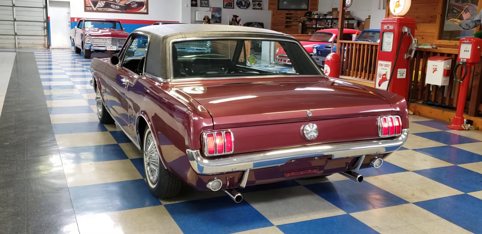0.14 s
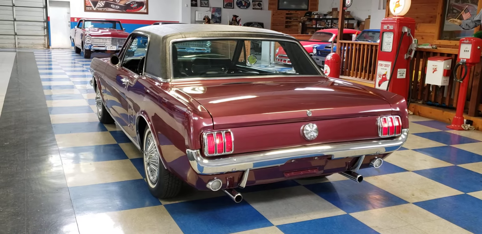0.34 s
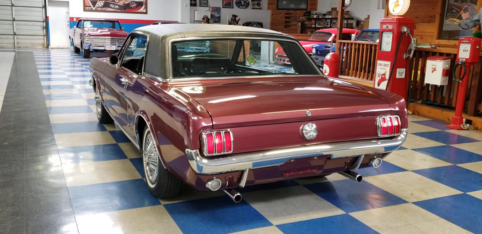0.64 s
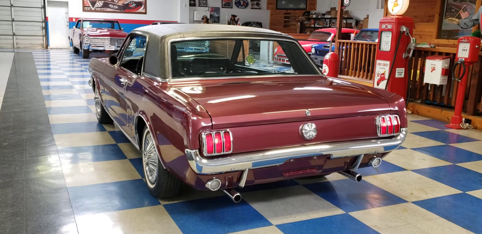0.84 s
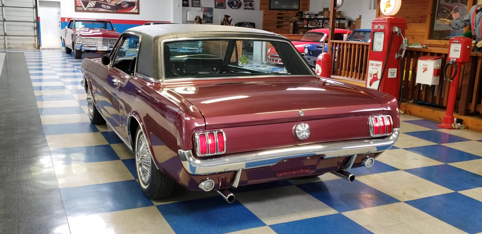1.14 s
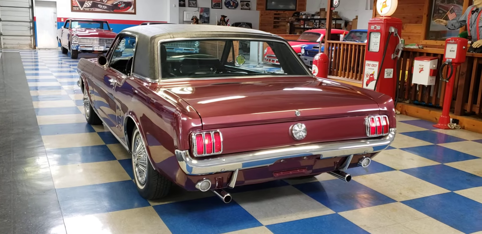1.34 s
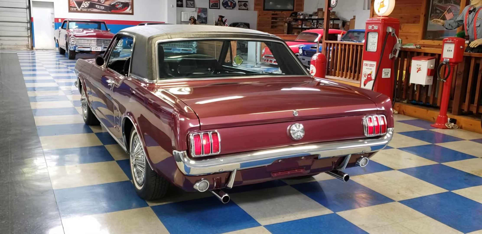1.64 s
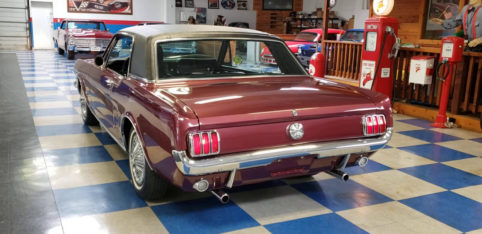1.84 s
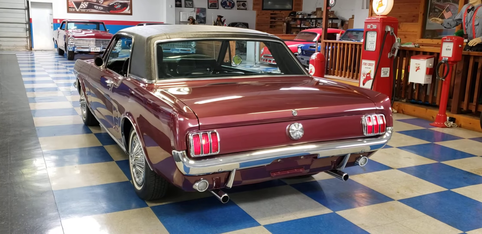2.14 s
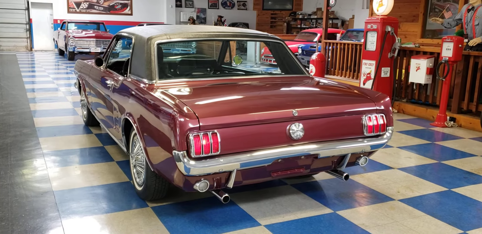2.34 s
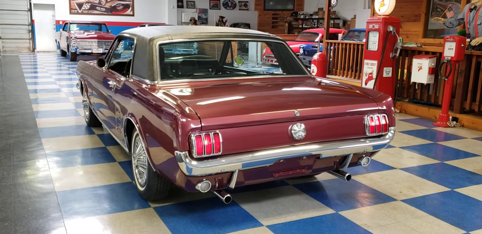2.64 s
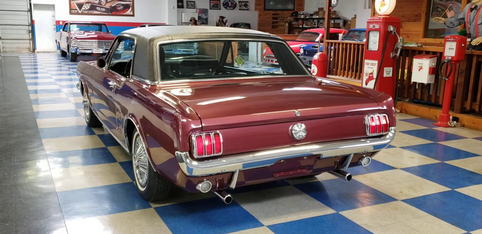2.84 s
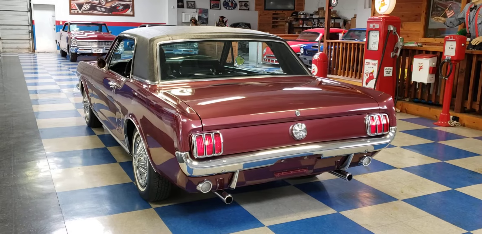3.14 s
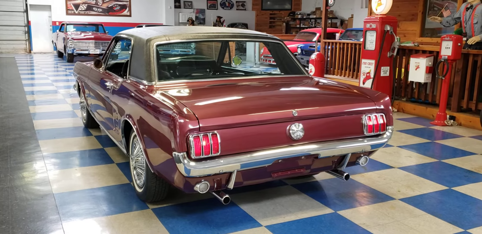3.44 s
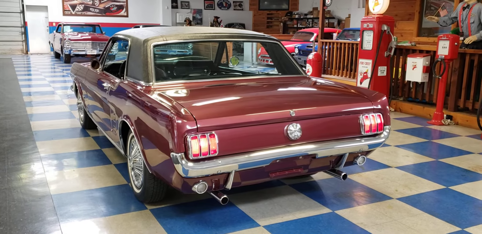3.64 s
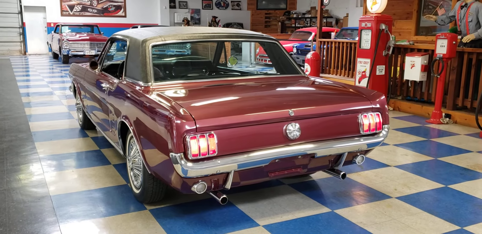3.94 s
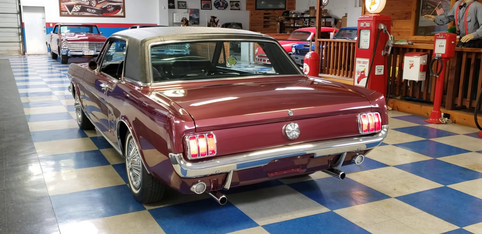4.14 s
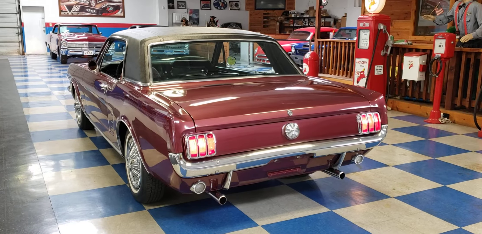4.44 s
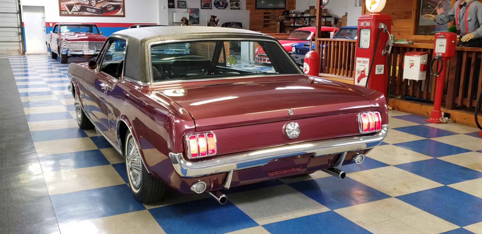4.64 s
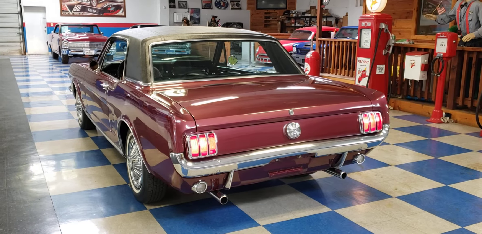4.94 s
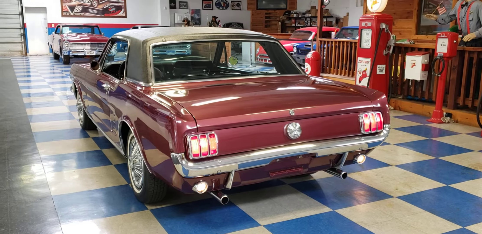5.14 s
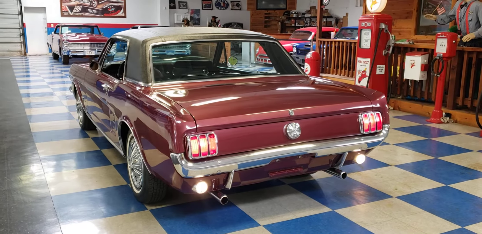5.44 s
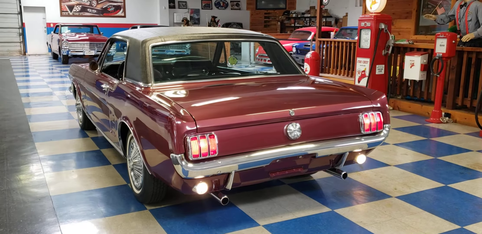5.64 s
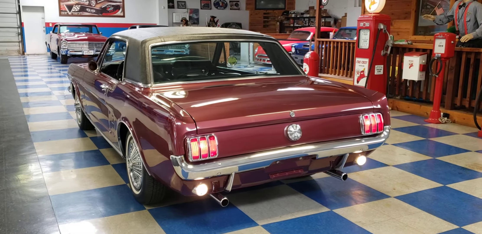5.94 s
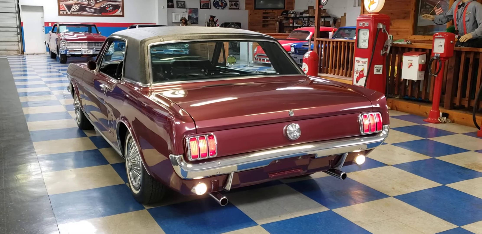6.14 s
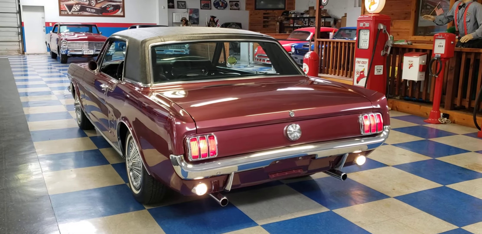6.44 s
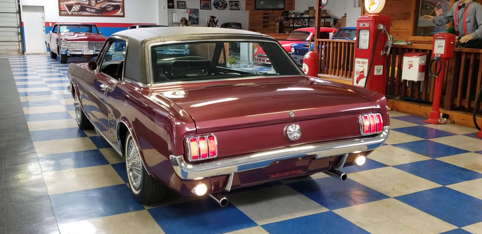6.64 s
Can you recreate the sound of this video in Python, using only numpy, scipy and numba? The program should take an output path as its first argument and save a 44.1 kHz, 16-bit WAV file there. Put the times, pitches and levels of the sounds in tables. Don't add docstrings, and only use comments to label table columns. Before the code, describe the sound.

An old V8 idles with a lumpy burble in a large tiled hall, is revved twice, then a loud metallic gear clack rings out.

```python
import sys
import numpy as np
from scipy import signal
from scipy.fft import rfft, irfft
from scipy.io import wavfile
from scipy.ndimage import uniform_filter1d
from numba import njit

SR = 44100
rng = np.random.default_rng(int(sys.argv[2]) if len(sys.argv) > 2 else 0)


def unload_wav(signal):
    wavfile.write(
        sys.argv[1],
        SR,
        np.round(np.clip(np.atleast_2d(signal).T, -1, 1) * 32767).astype(np.int16),
    )


def amplitude_ratio(level_db):
    exponent = np.asarray(level_db, float) / 20
    return 10 ** exponent


N = 299880
TIME_S = np.arange(N) / SR
BINS_HZ = np.arange(N // 2 + 1) * SR / N + 1
IDLE_HZ = 58


def unit(x):
    return x / np.sqrt(np.mean(x ** 2))


def steady(x):
    return x / np.sqrt(uniform_filter1d(x ** 2, size=SR // 2) + 1e-18)


def together(*dbs):
    return 10 * np.log10(sum(amplitude_ratio(db) ** 2 for db in dbs))


def speed_db(hz):
    return 20 * np.log10(hz / IDLE_HZ)


def columns(table):
    start_s, *rest = np.transpose(table)
    return [np.interp(TIME_S, start_s, column) for column in rest]


def over_hz(table):
    hz, value = np.transpose(table)
    return np.interp(np.log(BINS_HZ), np.log(hz), value)


@njit
def svf(x, hz, width):
    y, band, low = np.empty(len(x)), 0., 0.
    g, damping = np.tan(np.pi * hz / SR), width / hz
    for i in range(len(x)):
        v = (band + g * (x[i] - low)) / (1 + g * (g + damping))
        band, low = 2 * v - band, low + 2 * g * v
        y[i] = damping * v
    return y


def ring(x, modes):
    out = 0
    for k, (hz, width_hz, level_db) in enumerate(modes):
        out = out + (-1) ** k * amplitude_ratio(level_db) * svf(x, 1. * hz, 1. * width_hz)
    return out


def tuning(hz, note_hz, width_hz):
    return 1 / (1 + (2 * (hz - note_hz) / width_hz) ** 2)


def walk(rate):
    hold = int(SR / rate)
    steps = np.repeat(rng.standard_normal(N // hold + 1), hold)
    return 1.3 * uniform_filter1d(uniform_filter1d(steps, hold), hold)[:N]


def air(colour_db=0):
    # frequency_hz, likeness_0_to_1
    likeness = [(60, 1.0), (130, 0.9), (290, 0.72), (640, 0.95), (1410, 0.11), (3100, 0.01), (6820, 0),
                (15000, -0.0)]
    like = np.clip(over_hz(likeness), 0, 1) ** .5
    mid, side = rfft(rng.standard_normal((2, N))) * amplitude_ratio(colour_db) * np.sqrt([1 + like, 1 - like])
    return unit(irfft(np.array([mid + side, mid - side]), N))


def engine():
    # start_s, firing_rate_hz, exhaust_pressure_db, evenness_0_to_1
    run = [(0, 57.16, -1, 0.04), (1.1, 58.42, 2.5, 0.1), (1.19, 69.46, 2.5, 0.22), (1.4, 130.2, 2.5, 0),
           (1.53, 113.5, 3, 0.2), (2.05, 80.5, -3.5, .08), (2.14, 96.75, 2, 0.04), (2.31, 145.9, 4, 0),
           (2.52, 122.7, -2, 0.04), (2.76, 99.63, 1.5, 0.03), (2.99, 85.3, -2, 0.09),
           (3.5, 68.82, -0.5, 0.1), (4.2, 60.62, -1, 0.12), (4.9, 63.52, 1.5, 0.1),
           (5.49, 59.28, 1.5, 0.27), (5.68, 48, 2, 0.05), (5.97, 43.05, -4.5, .04),
           (6.1, 45.57, -0.5, 0.66)]
    # start_s, air_leak_db, edge_sharpness_db
    pedal = [
        (.4, -58.5, -13),
        (1, -52, -15),
        (2.8, -73, -25),
        (3.55, -67, -10),
        (3.7, -52.5, -18),
        (4.42, -50.5, -16.5),
        (5.2, -49, -7.5),
        (5.7, -49, -10),
        (6.8, -50.5, -9.5),
    ]
    # floor_db, level_at_idle_db, growth_db_per_db_of_speed, full_throttle_db
    ring_law = (-57, -39.5, 1.08, -49)
    rasp_law = (-48, -48.5, 1.68, -44)
    burble_law = (-32, -46, 2.5, -43)
    intake_law = (-49.5, -66, 3, -34.5)
    fan_law = (-56, -55.5, 2.5, -49)
    servo_law = (-109, -73, 3, -44.5)
    edge_law = (-97, -78.5, 2.5, -64)
    fine_law = (-70, -77, 3, -52)
    hz, pressure_db, even = columns(run)
    leak_db, sharp_db = columns(pedal)
    even = np.clip(even, .03, 1)
    suction_db = np.maximum(throttle(), -60)
    coast = np.clip((hz - 59.2) / 8.2, 0, 1) * np.clip(1 - amplitude_ratio(suction_db), 0, 1)
    popping = coast * np.clip((hz - 86) / 15, 0, 1)

    first_db, second_db = orders(hz, pressure_db, suction_db, even, coast)
    ring_db = layer(ring_law, hz, suction_db) + 0.48 * pressure_db
    rasp_db = layer(rasp_law, hz, suction_db) + 0.56 * pressure_db
    burble_db = layer(burble_law, hz, suction_db) + pressure_db + 0.5 * coast
    pipes, rasp, gate = exhaust(hz, first_db, second_db, ring_db, rasp_db, even, burble_db, popping)

    intake_db = layer(intake_law, hz, suction_db) - 4.5 * coast
    fan_db = layer(fan_law, hz, suction_db)
    servo_db = together(layer(servo_law, hz, suction_db), leak_db)
    edge_db = together(layer(edge_law, hz, suction_db), leak_db + sharp_db)
    fine_leak_db = -29 + .52 * (leak_db + sharp_db) + 0.64 * speed_db(hz)
    fine_db = together(layer(fine_law, hz, suction_db), fine_leak_db)
    rush = bay(gate, intake_db, fan_db, servo_db, edge_db, fine_db)
    return pipes, rasp, rush, gate


def throttle():
    # opening_s, open_s, shutting_s, suction_db
    blips = [
        (1.15, 1.3, 1.409, -0.5),
        (2.1, 2.176, 2.28, -1),
    ]
    shut_db, shut_s = -14.5, .04
    levels = []
    for opens, wide, shuts, level_db in blips:
        closed = np.maximum((wide - TIME_S) / (wide - opens), (TIME_S - shuts) / shut_s)
        levels.append(level_db + shut_db * np.maximum(closed, 0))
    return together(*levels)


def layer(law, hz, suction_db):
    floor_db, idle_db, growth, open_db = law
    return together(floor_db, idle_db + growth * speed_db(hz), open_db + suction_db)


def orders(hz, pressure_db, suction_db, even, coast):
    # frequency_hz, level_db
    pipe_pass = [(44, -23.5), (58, -27.5), (82, -31), (100, -30.5), (128, -23.5), (165, -35), (205, -29),
                 (260, -45)]
    # centre_s, first_order_change_db, second_order_change_db
    stumbles = [(0, 5.5, -25.5), (.23, -8, -10), (0.263, 4.5, 9), (.32, -19, -13), (.36, 0, -13),
                (.45, 1, -19), (.58, 2, -12), (1.44, -16, 0), (1.27, 8.5, 0), (1.651, -21, -4), (2, 7, -2),
                (3.2, -2, 11), (3.24, -15, -10), (4.2, -11, -11), (5.22, -3, -7), (5.81, -7, -22)]
    stumble_s = 0.024
    at_hz, pass_db = np.transpose(pipe_pass)
    passed_db = np.array([np.interp(np.log(k * hz), np.log(at_hz), pass_db) for k in (1, 2)])
    first_db = 5.5 * amplitude_ratio(suction_db)
    second_db = -0.44 + amplitude_ratio(suction_db) - 1.5 * coast
    second_db = second_db + 0.45 * 20 * np.log10(np.minimum(even / 0.1, 1))
    levels_db = passed_db + pressure_db + np.array([first_db, second_db])
    for centre_s, *change_db in stumbles:
        dip = np.clip(1 - np.abs(TIME_S - centre_s) / stumble_s, 0, 1)
        levels_db = levels_db + np.outer(change_db, dip)
    return levels_db


def exhaust(hz, first_db, second_db, ring_db, rasp_db, even, burble_db, coast):
    # frequency_hz, width_hz, level_db
    pipe_modes = [(119, 29, -2.5), (187.4, 28.3, -3.5), (214.5, 21, -5), (259.5, 26, -8), (271.5, 18.4, -3)]
    # frequency_hz, width_hz, level_db
    burble_modes = [(50.8, 22, -1), (77.2, 18.4, -2), (103.8, 28, -0.5)]
    # frequency_hz, width_hz, level_db
    shell_modes = [(349, 23.6, -3.5), (472.8, 46.4, -0.5), (568, 62, -4.5), (659.6, 47.5, -6)]
    cylinders = [0.24, -0.45, 0.29, -0.58, 0.38, 0.17, -0.41, 0.52]
    lead = {2: -1.8, 3: 2.0, 4: .8}
    firings = np.cumsum(hz * (1 + .008 * walk(25))) / SR
    count = firings.astype(int)
    since = firings - count

    throb = amplitude_ratio(first_db + 0.29 * walk(20)) * np.cos(2 * np.pi * firings)
    throb = throb + amplitude_ratio(second_db + 1.94 * walk(23.24)) * np.cos(4 * np.pi * firings + lead[2])
    for order, order_db, width_hz in ((3, -32, 150), (4, -24.5, 33.5)):
        tuned = np.sqrt(tuning(order * hz, 196, width_hz))
        tone = np.cos(2 * np.pi * order * firings + lead[order])
        throb = throb + amplitude_ratio(order_db + 2.85 * walk(9)) * even * tuned * tone
    throb = throb + banks(hz, firings, 1.3 * even, coast)

    luck = 0.2 * rng.standard_normal(N // 100)
    uneven = (0.42 * np.resize(cylinders, N // 100) + luck)[count]
    puff = (0.13 + uneven + 1.53 * rng.standard_normal(N)) * np.exp(-since / 0.059)
    lope = steady(svf(ring(puff, pipe_modes), 226.0, 214.0))
    burble = steady(svf(ring(uneven * np.exp(-since / 0.063), burble_modes), 92.0, 81.0))
    gate = 1.6 + np.abs(0.2 + uneven) * np.exp(-since / 0.43)
    rasp = unit(np.array([ring(side * gate, shell_modes) for side in air()]))
    pipes = np.sqrt(2) * throb + amplitude_ratio(ring_db + 6.0) * lope + amplitude_ratio(burble_db) * burble
    return pipes, amplitude_ratio(rasp_db + 0.58) * rasp, gate


def banks(hz, firings, calm, coast):
    # order, level_on_a_note_db
    bank_orders = [(3 / 8, -51), (4 / 8, -31.5), (11 / 8, -35), (13 / 8, -33), (19 / 8, -29.5),
                   (27 / 8, -33.5), (35 / 8, -43)]
    # frequency_hz, width_hz
    bank_notes = [(55, 9.1), (88, 24), (193, 21), (256, 25)]
    out = 0
    for order, level_db in bank_orders:
        tuned = np.sqrt(sum(tuning(order * hz, note_hz, width_hz) ** 2 for note_hz, width_hz in bank_notes))
        popping = coast if order < 1 else 1
        tone = np.cos(2 * np.pi * (order * firings + rng.random()))
        out = out + amplitude_ratio(level_db + 3.4 * walk(8)) * tuned * popping * tone
    return out * np.clip(1 - calm, 0, 1)


def bay(gate, intake_db, fan_db, servo_db, edge_db, fine_db):
    # frequency_hz, width_hz, level_db
    intake_modes = [(1010, 89, -0.5), (1440, 84, 1), (1597, 116, 1), (1957, 103, -8.5), (2785, 24, -5),
                    (3410, 84, -12), (3880, 85, -13)]
    # frequency_hz, level_db
    fan_colour = [(700, -5), (1000, 2.5), (2000, -2.5), (3500, -3.5), (5000, -10), (6500, -18), (8000, -40)]
    servo_colour = [(2800, -8.5), (3900, 0), (4400, -1), (5200, 1), (5900, -3), (6500, -28), (7200, -27)]
    edge_colour = [(5400, -13), (6200, 2), (7000, -7), (7500, -11), (8300, -27), (9500, -40)]
    fine_colour = [(6500, -37), (8200, -11.5), (10000, -7), (12500, -1), (13800, -6), (15300, 1.5),
                   (17000, 1.5)]
    breath = amplitude_ratio(3 * walk(40)) * gate ** 3.5
    intake = np.array([ring(side * breath, intake_modes) for side in air()])
    intake = intake / np.sqrt(uniform_filter1d(np.mean(intake ** 2, axis=0), size=SR // 4))
    fan = air(over_hz(fan_colour)) * amplitude_ratio(fan_db + 4.0 + .5 * walk(18))
    flow = amplitude_ratio(0.3 * walk(22))
    servo = air(over_hz(servo_colour)) * amplitude_ratio(servo_db + 1.0)
    edge = air(over_hz(edge_colour)) * amplitude_ratio(edge_db + 5.5)
    fine = air(over_hz(fine_colour)) * amplitude_ratio(fine_db + 9.0 + .5 * walk(44))
    return intake * amplitude_ratio(intake_db + 2.0) + fan + (servo + edge + fine) * flow


def whistles(gate):
    # start_s, end_s, pitch_hz, level_db
    leaks = [
        (0, .14, 3290, -57.5),
        (.85, 1.24, 3317, -57.5),
        (1.315, 1.375, 4680, -47),
    ]
    out = 0
    for start_s, end_s, pitch_hz, level_db in leaks:
        swell = np.clip(np.minimum(TIME_S - start_s + 0.036, end_s - TIME_S) / 0.037, 0, 1)
        tone = np.sin(2 * np.pi * np.cumsum(pitch_hz * (1 + .01 * walk(300))) / SR)
        out = out + amplitude_ratio(level_db + 4 + 3.5 * walk(70)) * swell * tone * unit(gate ** 3)
    return out * np.array([[1.2], [.6]])


def gear():
    # start_s, peak_db, ring_hz, fade_ms, thud_share_db
    knocks = [(5.504, -28.5, 4614, 24.6, -4), (5.53, -31, 3000, 22, 2), (5.57, -27, 6000, 12, 0),
              (5.5796, -15, 5070, 3.2, -12), (5.583, -10, 4970, 2.32, -24), (5.584, -7, 4350, 2.08, -34),
              (5.5895, -14.5, 2230, 1.2, -18), (5.59, -12, 5440, 1.61, -17), (5.5854, -19, 2940, 1.8, -18),
              (5.597, -20, 5100, 5.8, 0), (5.612, -21.5, 5500, 3.9, -1.5), (5.619, -20, 5506, 2.9, -8.5),
              (5.635, -32, 2900, 7.7, 11), (6.012, -37, 3500, 5.9, 2), (6.086, -34, 3960, 9, -17)]
    # frequency_hz,
    # level_db
    shade = [(500, 0), (6000, 0), (7200, -5), (8200, -10.5), (11000, 2.5), (16000, 4)]
    size = 3000
    out, t = np.zeros((2, N)), np.arange(size) / SR
    for start_s, peak_db, ring_hz, fade_ms, thud_db in knocks:
        chance = rng.standard_normal((3, size))
        burst = np.exp(-1000 * t / fade_ms) * np.minimum(t / 0.00071, 1)
        clack = np.array([svf(svf(side * burst, 1. * ring_hz, .18 * ring_hz), 1. * ring_hz, .8 * ring_hz)
                          for side in chance[:2]])
        thud = svf(chance[2] * np.exp(-t / 0.0089), 380.0, 590.0)
        knock = clack / np.abs(clack).max() + amplitude_ratio(thud_db) * thud / np.abs(thud).max()
        i = int(start_s * SR)
        out[:, i:i + size] += amplitude_ratio(peak_db) * knock
    return irfft(rfft(out) * amplitude_ratio(over_hz(shade)), N)


def clang():
    # frequency_hz, level_db
    clang_colour = [(200, -30), (500, -15), (1200, -2), (2500, 1.5), (4300, 0.5), (5600, 3.5), (7000, -2),
                    (8200, -19), (16000, -26)]
    gear_in_s = 5.584
    return irfft(amplitude_ratio(over_hz(clang_colour)) * np.exp(-2j * np.pi * BINS_HZ * gear_in_s), N)


def hall(x):
    t60_s, top_t60_s, edge_hz = 1.53, 0.35, 9200
    body, top = rng.standard_normal((2, 2, N)) * np.minimum(TIME_S / 0.0046, 1)
    body = rfft(body * amplitude_ratio(-60 * TIME_S / t60_s)) / (1 + (BINS_HZ / edge_hz) ** 4)
    top = rfft(top * amplitude_ratio(-60 * TIME_S / top_t60_s))
    return irfft(rfft(x) * (body + top), N)


def scene():
    pipes, rasp, rush, gate = engine()
    clack = gear()
    to_walls = amplitude_ratio(-28) * clang() + amplitude_ratio(-47.5) * clack + amplitude_ratio(-59.0) * pipes + amplitude_ratio(-42.5) * rush
    return pipes + rasp + rush + whistles(gate) + clack + hall(to_walls)


def roll_off(x):
    return signal.sosfilt(signal.butter(12, 16900, fs=SR, output="sos"), x)


def record(dry):
    # frequency_hz, level_db
    lean_table = [(60, 1.0), (110, 1), (200, 2), (380, 2), (700, 3), (1290, 3.5), (2380, 9), (4400, 4.5),
                  (8120, -3), (15000, 0.5)]
    lean = amplitude_ratio(over_hz(lean_table) / 2)
    ports = irfft(rfft(dry) * np.array([lean, 1 / lean]) * (BINS_HZ < 15780), N)
    ports = signal.sosfilt(signal.butter(6, 35, "high", fs=SR, output="sos"), ports)
    return roll_off(ports)


dry = scene()
out = record(dry)
unload_wav(out)
```